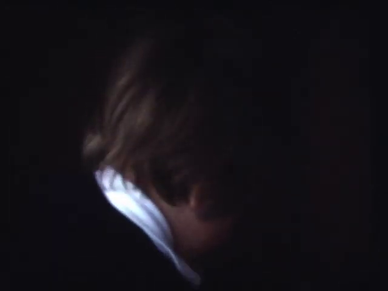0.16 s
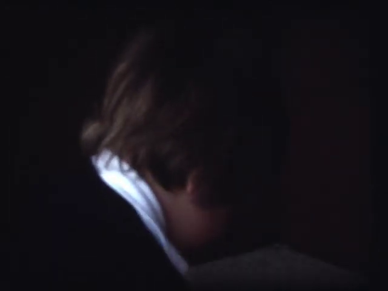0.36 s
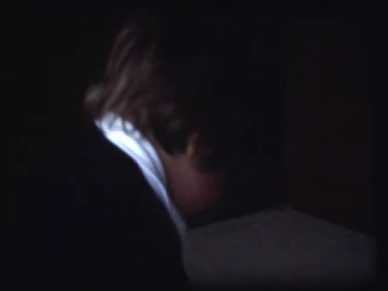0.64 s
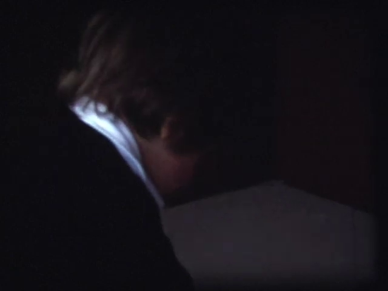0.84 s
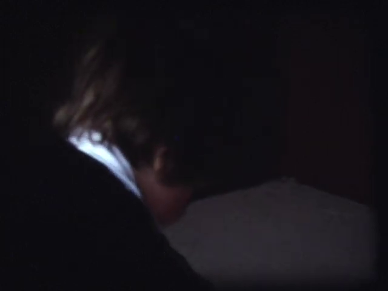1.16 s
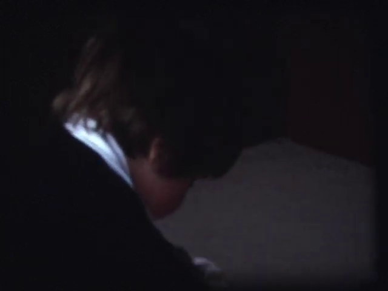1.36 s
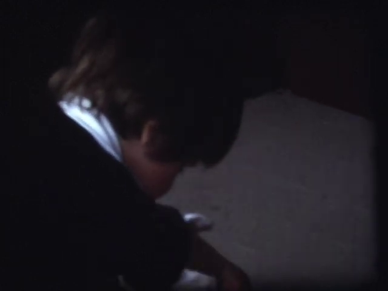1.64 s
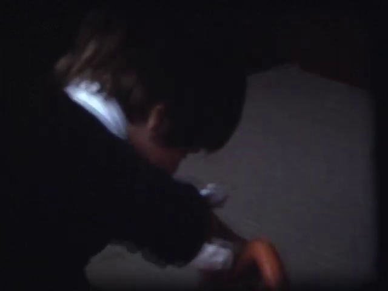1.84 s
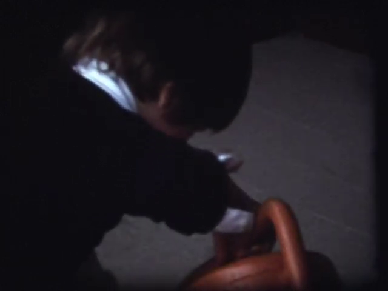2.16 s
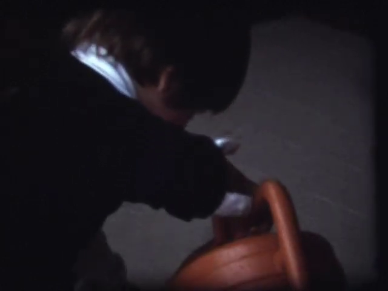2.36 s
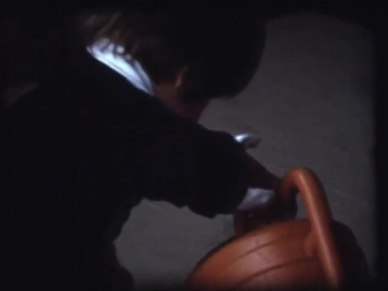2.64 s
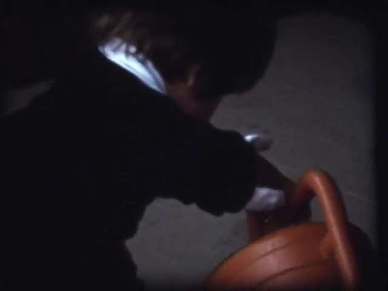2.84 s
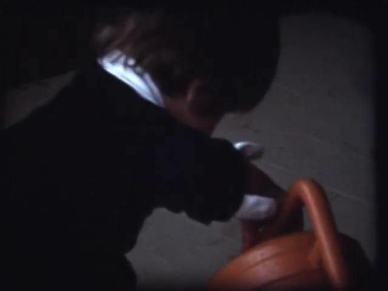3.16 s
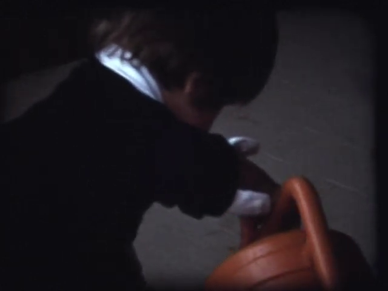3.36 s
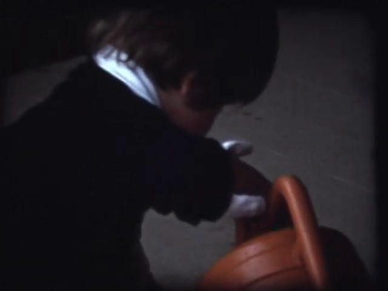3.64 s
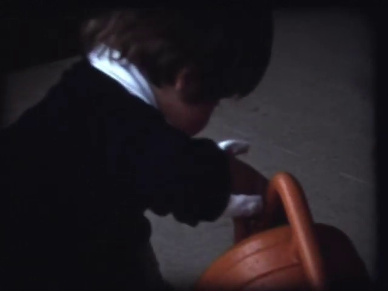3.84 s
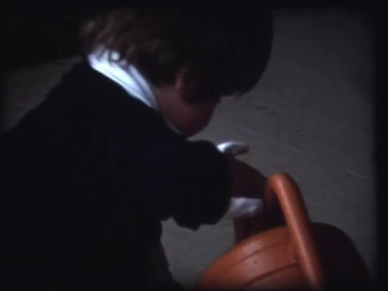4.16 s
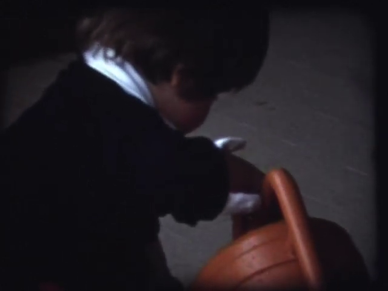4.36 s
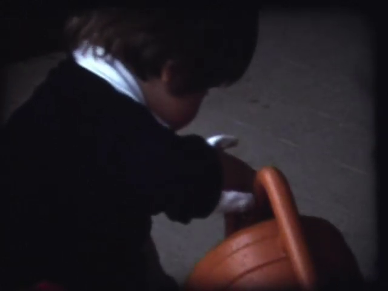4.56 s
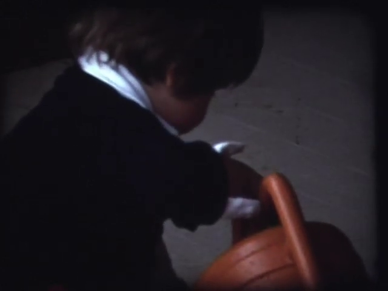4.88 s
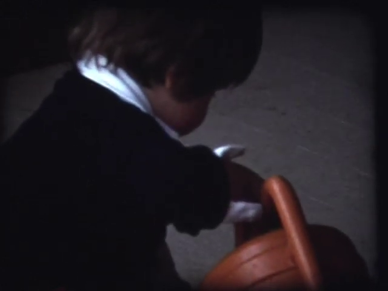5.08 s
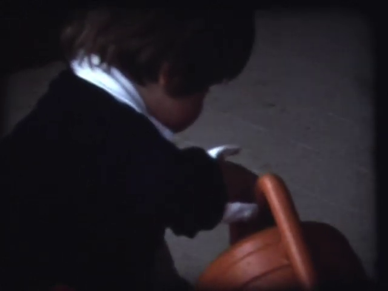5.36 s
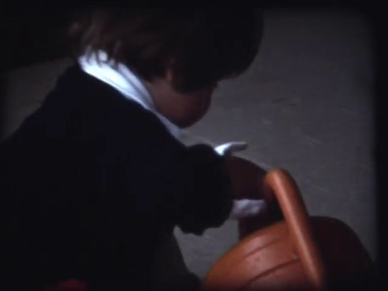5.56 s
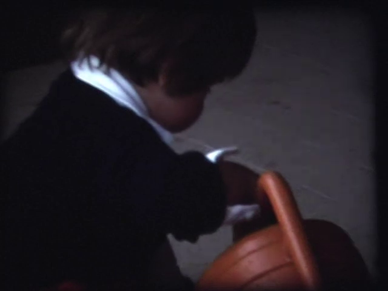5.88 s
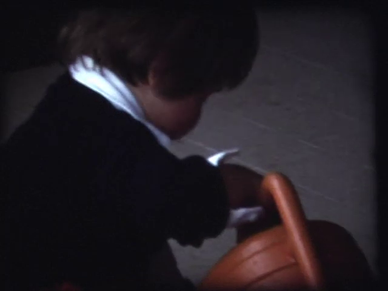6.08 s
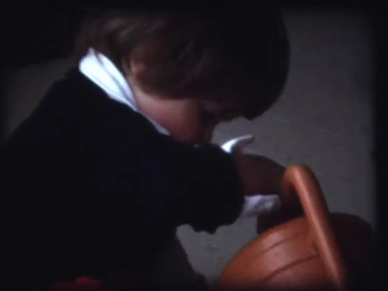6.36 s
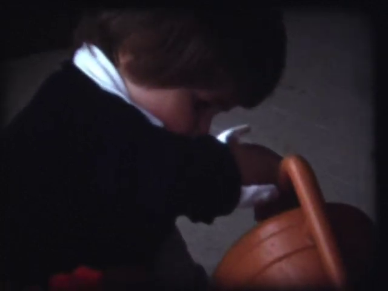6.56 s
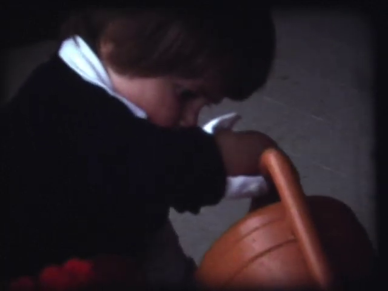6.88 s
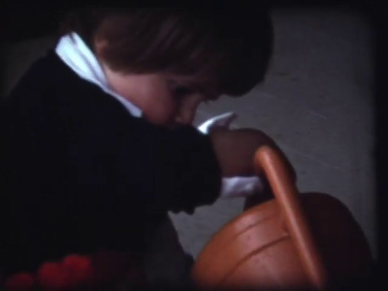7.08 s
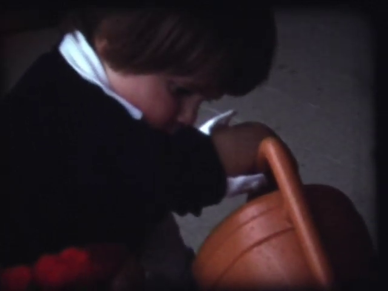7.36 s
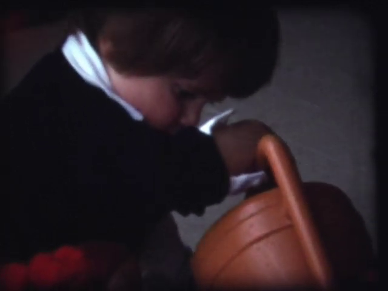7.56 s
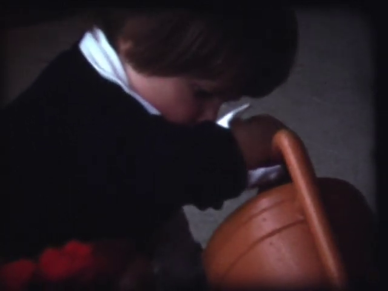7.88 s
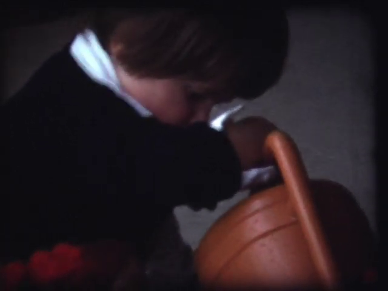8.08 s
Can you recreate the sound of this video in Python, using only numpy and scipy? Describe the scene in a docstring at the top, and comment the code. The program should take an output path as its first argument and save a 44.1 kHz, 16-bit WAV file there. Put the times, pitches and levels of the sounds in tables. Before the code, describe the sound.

A small film projector runs throughout, a little way from a stereo microphone in a room with a short, light echo. The motor holds a steady mid-pitched whine over a softer hum and thrum, with an even hiss of fan and gears. From the start, the mechanism ticks crisply, about fifteen times a second. At about 2.9 to 3.3 seconds the film snaps and rattles in a quick cluster of sharp clicks; the ticking grows louder, fades briefly and is back to normal by 3.7. Lighter clicks come near 3.8 and 4.5, a few more around 5.3, and a loud snap at 5.7. Small clicks follow from 6.2 to 6.5. The ticking stops at about 6.4 while the whir continues, with a few light knocks around 7.5. At 8 seconds there is a click, the whine weakens and drops slightly, and the ticking resumes.

```python
"""Film projector in a room

A small projector runs on a table, a stereo microphone a little way off. The motor whines on shaft
orders beating with the mains, the cam thrums once a frame, fan and gears hiss. The claw ticks at every
frame while it grips the film; now and then the film snaps and rattles in the gate."""
import sys
import numpy as np
from scipy import signal
from scipy.fft import rfft, irfft, next_fast_len
from scipy.io import wavfile
from scipy.ndimage import uniform_filter1d

SR = 44100
rng = np.random.default_rng(int(sys.argv[2]) if len(sys.argv) > 2 else 0)


def materialize(psi):
    """Save the field psi as 16-bit PCM at rate SR to the path in sys.argv[1].

    A 1-D psi becomes a single channel; in a 2-D psi each row is a channel.
    """
    bounded = np.clip(np.atleast_2d(psi).T, -1, 1)
    quanta = np.round(bounded * 32767).astype(np.int16)
    wavfile.write(sys.argv[1], SR, quanta)


N = 362484

SLOTS, PULL_HZ = 15, 99.95  # rotor slots; magnetic pull of the mains
SWELL_HZ, SWELL_DIP_S, SWELL_WHINE_DB, SWELL_BEATS_DB = 1.75, 0.63, .8, 0.15
# Motor tones. Each row: multiple of the shaft rate, added multiple of the pull rate, level in dB.
MOTOR_TONES = [(22, -2, -54), (15, -1, -55), (22, -1, -55), (3, 0, -62), (5, 0, -51), (8, 0, -57),
               (12, 0, -56), (15, 0, -30), (16, 0, -42), (17, 0, -49), (18, 0, -57), (19, 0, -56),
               (6, 1, -48), (10, 1, -53), (14, 1, -46), (15, 1, -40), (11, 2, -55), (15, 2, -39),
               (1, 3, -54), (8, 3, -47), (3, 1, -52), (0, 1, -80)]
# The motor's drift. Each row: time in seconds, slot whine in Hz, then changes in dB of the whine,
# the order above it and the mains beats.
MOTOR_DRIFT = [(0, 659.8, 0.5, 3, -0.5), (1.4, 659.7, 1, -1, 0), (1.8, 659.4, .5, -1, 0),
               (4.6, 659.4, 0.5, 0, 0.5), (5.1, 659.5, -2, -13, 0.5), (5.75, 659.9, -3.5, -11, 0.5),
               (6.4, 660, -2.5, -3, 1.5), (7.4, 660, -3, -10, 0), (7.7, 659.8, 1.5, -2, 0.5),
               (7.97, 659.8, -3, 0, 2.5), (8.03, 643, -18, 8, -4), (8.22, 644.5, -18, 8, -1.5)]
# Cam thrum. Each row: multiple of the frame rate, level in dB.
CAM_HARMONICS = [(5, -79), (7, -74), (8, -74), (11, -59), (12, -54), (13, -51), (15, -54), (16, -58),
                 (18, -60), (24, -53), (28, -55), (29, -53), (31, -50), (32, -53), (34, -51), (35, -50),
                 (36, -56), (40, -59), (46, -59), (50, -58), (70, -60)]
# Fan and gear hiss. Each row: frequency in Hz, relative level in dB.
HISS_SHAPE = [(60, -47.5), (110, -45), (200, -22), (500, -15.5), (700, -13), (950, -18.5), (1300, -24.5),
              (2800, -25.5), (3300, -22.5), (4500, -22.5), (4950, -27.5), (5600, -32), (7000, -45),
              (12000, -45.5), (13600, -53), (14200, -60)]
# Panels that the hiss excites. Each row: frequency in Hz, width in Hz, gain in dB.
PANEL_MODES = [(343, 30, -3), (530, 20, 0), (1099, 13.4, 4.5), (2030, 23, -6), (3200, 57, -4.5),
               (3494, 96, -5), (3725, 140, -2.5), (4160, 78, -3), (4410, 110, -4)]
# Load on the gears. Each row: time in seconds, gain of the upper hiss in dB.
GEAR_LOAD = [(0, 0), (3, 0.5), (5, 1.5), (8.22, 1)]

FRAME_S, FIRST_TICK_S = .065007, .0122
TICKS_STOP_S, TICKS_RESUME_S = 6.4, [8.0540, 8.1206, 8.1872]  # ticking stops, then resumes near the end
# The claw's grip. Each row: time in seconds, strength of the blow in dB.
CLAW_GRIP = [(0, -12.5), (3.03, -13), (3.05, -5), (3.62, -27), (3.64, -13.5), (5, -12.5), (6.4, -14),
             (8.05, -11), (8.22, -14.5)]
# The claw's ring. Each row: frequency in Hz, width in Hz, gain in dB.
CLAW_MODES = [(2020, 3300, -6.5), (3750, 730, -6), (5570, 970, 10.5), (8640, 1870, 1), (11550, 2420, 1)]
# Later contacts of a stroke. Each row: delay in seconds, frequency in Hz, width in Hz, gain in dB.
LATER_CONTACTS = [(.0071, 3800, 1500, 3.5), (0.011, 5535, 500, 11.5), (0.036, 5600, 750, -14),
                  (.0393, 3780, 1500, -13)]

# Film snaps. Each row: start in seconds, crack in dB, blow on the machine in dB, part struck.
SNAPS = [(2.8962, -16, -17, "housing"), (3.0699, -12.5, -8.5, "housing"), (3.0983, -5, 2, "guide"),
         (3.1149, -0.5, 5.5, "guide"), (3.1487, -8, -3, "guide"), (3.177, -22, -8, "guide"),
         (3.2772, -5, 7, "gate"), (3.462, -14.5, -13, "housing"), (3.7832, -14, -6.5, "housing"),
         (4.47, -13, -12.5, "housing"), (5.217, -13, -15, "housing"), (5.2378, -12, -19, "housing"),
         (5.2822, -3, -5, "housing"), (5.301, -10, -5.5, "housing"), (5.669, 1.5, 8, "lid"),
         (6.187, -15, -11, "housing"), (6.2516, -13, -11, "housing"), (6.385, -19, -18, "housing"),
         (6.452, -7.5, -3, "housing"), (7.424, -23, -10, "base"), (7.4953, -15, -1.5, "base"),
         (7.5274, -12.5, -2.5, "base"), (7.82, -36, -12, "housing"), (8.008, -19, -10, "housing")]
# Share of a crack in dB for film edge and film.
CRACK_SHARE_DB = (0.5, -2)
# For each part struck, the share of the blow in dB for guide, gate, housing, cover, base and lid.
BLOW_SHARE_DB = {"guide": (-3, -9, -8, -11, -11.5, -40), "gate": (-5, -1, -25, -18, -29, -45),
                 "housing": (-11, -9, 1.5, -2, -5, -30), "base": (-23, -24, -6, -9, 1, -40),
                 "lid": (-30, -16, -4, -8, -18, 3)}
# Rings of those eight parts, film edge to lid. Each row: frequency in Hz, width in Hz, gain in dB.
PART_MODES = [
    [(11100, 1660, 6), (12500, 1830, -7), (14300, 3100, -6)],
    [(8350, 3400, -2), (9770, 820, 5.5)],
    [(5930, 66, 16)],
    [(5500, 29, 18), (5260, 740, 1)],
    [(3820, 870, 3), (5060, 1600, 1)],
    [(2320, 670, 5.5), (1696, 1470, -4), (2830, 640, 4.5)],
    [(1116, 92, 1), (1255, 110, 8)],
    [(2276, 150, 1.5), (3860, 110, 8), (4050, 100, 7.5), (4320, 120, 1.5)],
]
# Seconds a snap takes to reach each of them.
REACH_S = (.0012, .0016, .002, .0023, .001, .0019, .0014, .001)

# Near echoes. Each row: delay in seconds, gain in dB.
ECHOES = [(.0008, 0.5), (.003, -1), (.007, -8), (0.0117, -7), (.0146, -2), (.018, -14), (.023, -26),
          (.032, -5)]
TAIL_DB, TAIL_T60 = -24.5, [(1000, 0.99), (4000, 0.46), (8000, 0.61), (14000, 0.5)]  # Hz, seconds
CLAW_TAIL_DB = -2  # the claw faces the microphone and stirs the room less than the snaps
# Stereo width. Each row: frequency in Hz, gain of the side signal in dB.
SIDE_GAIN = [(60, -7), (110, -10), (200, -20.5), (380, -19.5), (700, -15.5), (1290, -15), (2380, -10),
             (4400, -13), (8120, 3.5), (15000, -13)]
# Balance. Each row: time in seconds, left minus right in dB.
BALANCE = [(0, -0.1), (8.22, -0.5)]
# The microphone's treble. Each row: frequency in Hz, gain in dB.
MIC_RESPONSE = [(11500, 0.5), (13500, 7), (14300, -4), (15000, -25), (15300, -30)]


def undb(db):
    return 10 ** (np.asarray(db, float) / 20)


def along(points, hz):
    """Read (Hz, value) points on a log-frequency axis."""
    f, v = np.transpose(points)
    return np.interp(np.log(hz + 1), np.log(f + 1), v)


def colour(x, points):
    """Shape a sound by (Hz, dB) points."""
    size = next_fast_len(N)
    gain = undb(along(points, np.fft.rfftfreq(size, 1 / SR)))
    return irfft(rfft(x, size) * gain, size)[..., :N]


def ring(x, modes, order=1):
    """Sum of resonances, neighbours in opposite phase; order 2 makes each narrower and steeper."""
    out = 0
    for k, (hz, width, db) in enumerate(modes):
        section = np.r_[signal.iirpeak(hz, hz / width, SR)]
        out = out + (-1) ** k * undb(db) * signal.sosfilt(np.tile(section, (order, 1)), x)
    return out


def walk(rate):
    """Random levels held 1 / rate seconds and smoothed twice; spread near 1."""
    hold = int(SR / rate)
    steps = np.repeat(rng.standard_normal(N // hold + 1), hold)
    return 1.13 * uniform_filter1d(uniform_filter1d(steps, hold), hold)[:N]


def bursts(times, db, scraps, decay_s, rattle_db):
    """A click at each time, followed by a fading scrap of noise."""
    out, t = np.zeros(N + SR), np.arange(scraps.shape[1]) / SR
    for s, gain, scrap in zip(times, undb(db), scraps):
        i = int(s * SR)
        out[i] += gain
        out[i:i + len(t)] += gain * undb(rattle_db) * scrap * np.exp(-t / decay_s)
    return out[:N]


def tone(turns, db):
    """A sine in the mid, its quarter-turn twin in the side, as from a source off the microphone's axis."""
    angle = 2 * np.pi * turns
    return np.sqrt(2) * undb(db) * np.array([np.sin(angle), rng.choice([-1, 1]) * np.cos(angle)])


def motor(t):
    """Shaft orders and their mains beats; whine and beats swell slowly and each tone wavers."""
    times, *columns = np.transpose(MOTOR_DRIFT)
    whine_hz, whine_db, above_db, beats_db = (np.interp(t, times, c) for c in columns)
    shaft_turns = np.cumsum(whine_hz) / SLOTS / SR
    swell = -np.cos(2 * np.pi * SWELL_HZ * (t - SWELL_DIP_S))
    order_db = {SLOTS: whine_db + SWELL_WHINE_DB * swell, SLOTS + 1: above_db}
    phase = rng.random(32)  # the beats of one order pulse in step
    out = 0
    for order, beats, db in MOTOR_TONES:
        change_db = beats_db + SWELL_BEATS_DB * swell if beats else order_db.get(order, 0)
        turns = phase[order] + order * shaft_turns + beats * PULL_HZ * t
        out = out + tone(turns, db + change_db + 0.27 * walk(8.2))
    return out


def cam(t):
    """The cam thrums in the body of the machine on harmonics of the frame rate."""
    return sum(tone(rng.random() + k * t / FRAME_S, db + 0.68 * walk(5.3)) for k, db in CAM_HARMONICS)


def fan_and_gears(t, clatter_share=0.085, throb_hz=7.95, hiss_db=-32):
    """Hiss and once-a-frame gear clatter ring the panels; their ringing and the upper hiss throb."""
    one_frame = rng.standard_normal((2, int(FRAME_S * SR) + 1))
    clatter = one_frame[:, (t % FRAME_S * SR).astype(int)]
    noise = np.sqrt(1 - clatter_share) * rng.standard_normal((2, N)) + np.sqrt(clatter_share) * clatter
    throb_db = .5 * np.sin(2 * np.pi * throb_hz * t)  # a shaft order beats with the magnetic pull
    load_db = np.interp(t, *np.transpose(GEAR_LOAD))
    grit = undb(1.02 * walk(400) + 0.53 * walk(11) + throb_db + load_db)
    bass = signal.lfilter(*signal.butter(2, 1400, fs=SR), noise)
    panels = sum(ring(noise, [mode]) for mode in PANEL_MODES)
    hiss = colour(bass + (panels + noise - bass) * grit, HISS_SHAPE)
    return hiss * undb(hiss_db) / np.sqrt(np.mean(hiss ** 2))


def claw():
    """One crisp tick a frame while the claw grips, later contacts, and the film rustling as it settles."""
    times = np.r_[np.arange(FIRST_TICK_S, TICKS_STOP_S, FRAME_S), TICKS_RESUME_S]
    contacts = [(0, *mode) for mode in CLAW_MODES] + LATER_CONTACTS
    scraps = rng.standard_normal((len(times), 4000))
    scatter = rng.standard_normal((len(times), len(contacts) + 1)).T
    stroke_db = np.interp(times, *np.transpose(CLAW_GRIP)) + .5 * scatter[0]
    out = 0
    for k, (delay, *mode) in enumerate(contacts):
        hits = bursts(times + delay, stroke_db + .6 * scatter[k + 1], scraps, decay_s=.012, rattle_db=-40)
        out = out + (-1) ** k * ring(hits, [mode], order=2)
    return out


def film_snaps():
    """The film cracks, and its blow spreads from the struck part to the others."""
    times = np.array([row[0] for row in SNAPS])
    part_db = np.transpose([np.r_[np.add(crack, CRACK_SHARE_DB), np.add(blow, BLOW_SHARE_DB[part])]
                            for _, crack, blow, part in SNAPS])
    scraps = rng.standard_normal((len(times), 4000))
    return sum(ring(bursts(times + reach, db, scraps, decay_s=.0043, rattle_db=-24.5), modes, order=2)
               for db, reach, modes in zip(part_db, REACH_S, PART_MODES))


def room(ticks, snaps, tail_count=5):
    """Direct sound, near echoes and a tail that dies sooner in the treble, as mid and side hear them."""
    t = np.arange(SR // 2) / SR
    near = np.zeros((2, SR // 20))
    near[0, 1] = 1
    near[1, [0, 2]] = .6, -.6  # two ports a little apart: the side hears the slope of the direct sound
    for delay, db in ECHOES:
        near[:, int(delay * SR)] += undb(db) * rng.choice([-1, 1], 2)
    early = signal.fftconvolve((ticks + snaps)[None], near, axes=1)
    tails = np.zeros((tail_count, 2, len(t)))
    for hz in 700 * 2 ** np.arange(0, 4.6, .5):
        band = ring(rng.standard_normal(tails.shape), [(hz, hz / 3, 0)])
        tails += band * np.exp(-np.log(1000) * t / along(TAIL_T60, hz))
    tails *= undb(TAIL_DB) * np.minimum(t / 0.0067, 1)
    # no two blows radiate alike, so each excites its own blend around a common tail
    blend = np.array([walk(25) for _ in range(tail_count)])
    blend[0] += 1.5
    blend /= np.sqrt(np.sum(blend ** 2, axis=0))
    radiated = (undb(CLAW_TAIL_DB) * ticks + snaps) * blend
    late = signal.fftconvolve(radiated[:, None], tails, axes=2).sum(axis=0)
    return early[:, :N] + late[:, :N]


def scene():
    """The projector from a little way off, mid and side turned into left and right."""
    t = np.arange(N) / SR
    mid, side = motor(t) + cam(t) + fan_and_gears(t) + room(claw(), film_snaps())
    side = colour(side, SIDE_GAIN)
    pan_db = np.interp(t, *np.transpose(BALANCE))
    return np.array([(mid + side) * undb(pan_db / 2), (mid - side) * undb(-pan_db / 2)])


def record(dry):
    """Narrow notches thin the sound; the microphone peaks, then droops in the treble; the top is cut."""
    lag, depth, feedback = 147, 0.94, 0.73  # lag in samples: a notch every 300 Hz
    gap = np.zeros(lag - 1)
    notched = signal.lfilter(np.r_[1, gap, -depth], np.r_[1, gap, -feedback], dry)
    notched *= (1 + feedback) / (1 + depth)
    top_cut = signal.ellip(10, .2, 70, 15600, fs=SR, output="sos")
    return signal.sosfilt(top_cut, colour(notched, MIC_RESPONSE))


dry = scene()
out = record(dry)
materialize(out)
```